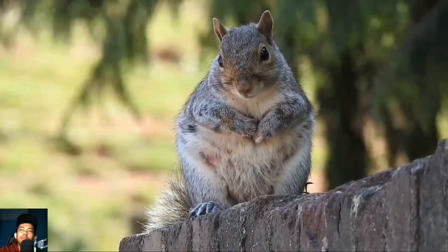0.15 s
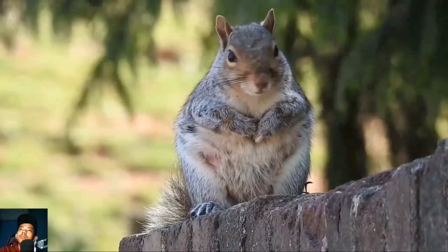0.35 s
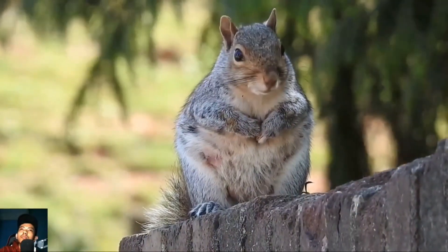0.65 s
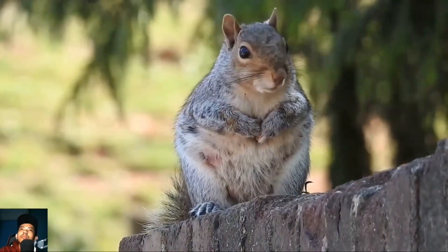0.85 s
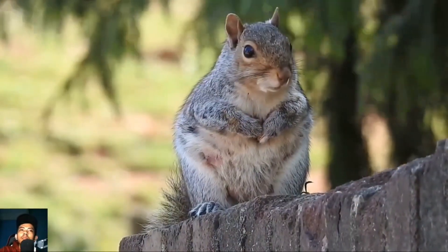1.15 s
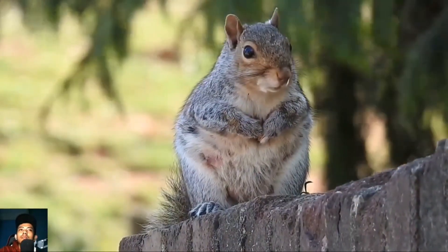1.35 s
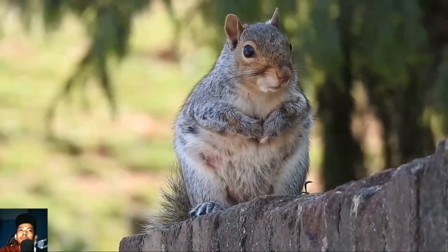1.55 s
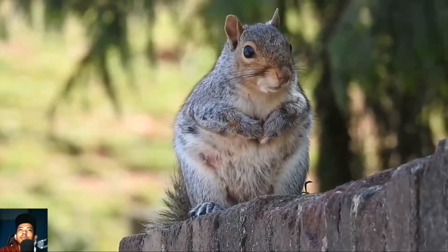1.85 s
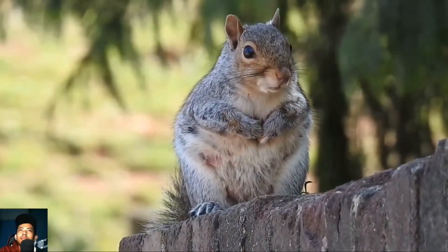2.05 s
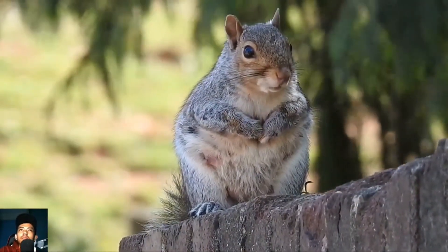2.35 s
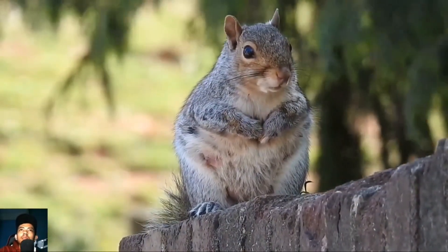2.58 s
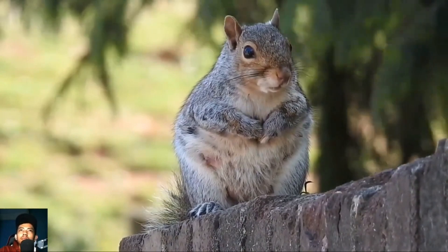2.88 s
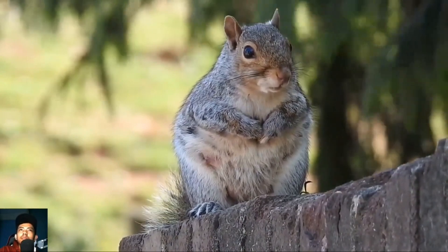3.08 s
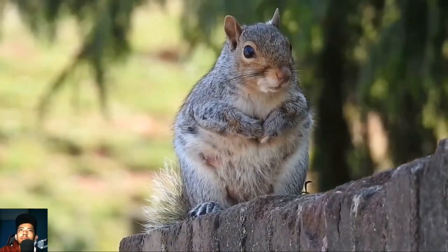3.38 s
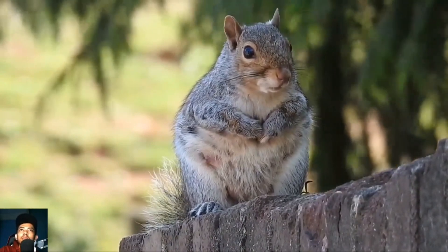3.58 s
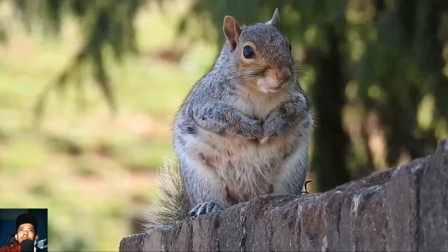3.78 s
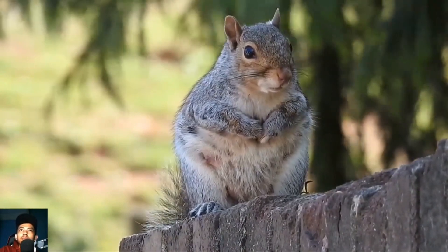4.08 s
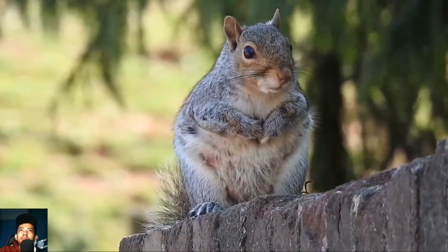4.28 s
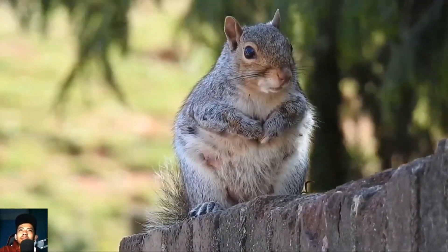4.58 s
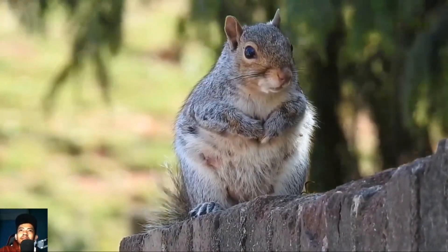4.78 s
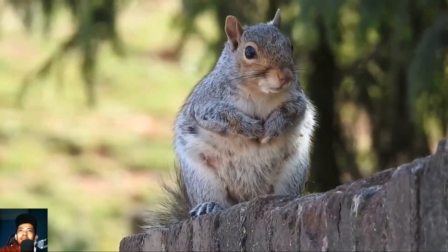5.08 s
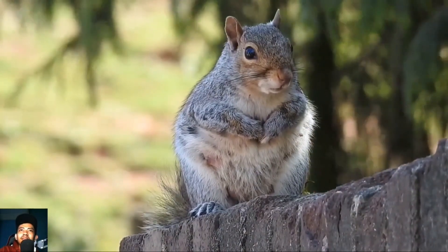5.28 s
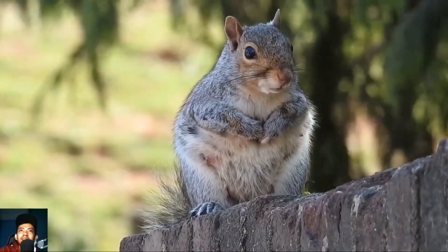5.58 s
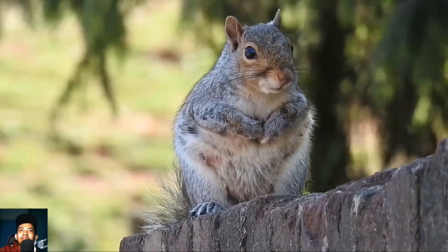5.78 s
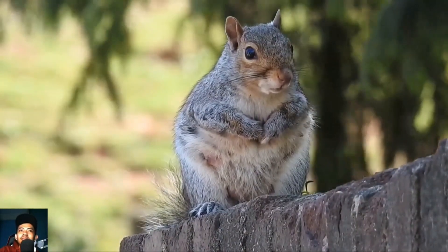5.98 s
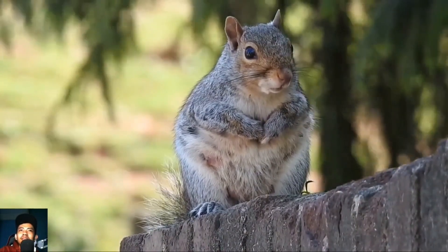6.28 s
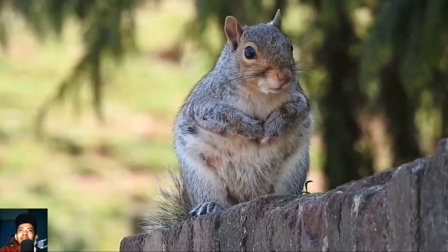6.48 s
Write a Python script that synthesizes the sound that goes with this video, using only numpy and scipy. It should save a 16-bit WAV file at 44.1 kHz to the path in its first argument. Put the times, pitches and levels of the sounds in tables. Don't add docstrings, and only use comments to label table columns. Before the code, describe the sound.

Outdoors a few metres from a squirrel on a fence. It starts with two quick pairs of thin squeaks, the second of each pair weaker, then a very faint one. From just past one second come eleven single sharp barks, irregularly spaced about half a second apart, each with a breathy edge and short echo from fence and trees. Low distant traffic and soft leaf hiss lie underneath.

```python
import sys
import numpy as np
from scipy import signal
from scipy.fft import rfft, irfft, next_fast_len
from scipy.io import wavfile
from scipy.ndimage import uniform_filter1d, minimum_filter1d, map_coordinates

SR = 44100
rng = np.random.default_rng(int(sys.argv[2]) if len(sys.argv) > 2 else 0)


def ratio(d):
    e = np.asarray(d, float) / 20
    return 10 ** e


def master(y):
    cut = np.clip(np.atleast_2d(y).T, -1, 1)
    pcm = np.round(cut * 32767)
    wavfile.write(sys.argv[1], SR, pcm.astype(np.int16))


N = 292912

# (start [s], length [s], top pitch [Hz], level [dB], half-step line over level [dB])
BARKS = [(1.262, .051, 2261, -18.5, 0), (1.715, .048, 2320, -16, 0), (2.370, .043, 2282, -16, 2),
         (2.913, .042, 2298, -17, -3.5), (3.334, .04, 2212, -16.5, -32), (3.752, .041, 2263, -16.5, -3),
         (4.236, .042, 2335, -15.5, -2), (4.951, .044, 2234, -16.5, -12), (5.352, .046, 2368, -15.5, -1.5),
         (5.852, .05, 2355, -16, -2), (6.57, .047, 2378, -15.5, 0)]
# (start [s], length [s], top pitch [Hz], level [dB], overtones over level [dB])
OPENING = [
    (0.222, .055, 2034, -22, 7.5),
    (0.733, .05, 2040, -23, 5),
]
# (start [s], length [s], top pitch [Hz], level [dB], overtones over level [dB])
CLOSING = [
    (.307, .046, 1841, -19, -5.5),
    (0.837, 0.0386, 2223, -26.5, -7.5),
    (1.181, .039, 1896, -36.5, -15.5),
]
# (time [s], peak [dB])
HOARSE = [(0.2229, -28.5), (0.3137, -36), (0.7342, -25.5), (0.842, -38), (1.1887, -52.5), (1.2675, -29),
          (1.724, -24.5), (2.3725, -27.5), (2.9174, -26.5), (3.3398, -26.5), (3.7594, -22), (4.2363, -26),
          (4.9531, -27), (5.3557, -28), (5.8564, -25), (6.5744, -28)]
BARK_ARCH = (.62, .55, .8, .71, .82)
OPENING_ARCH = (.68, .5, .76, .4, .4)
CLOSING_ARCH = (.56, .82, .86, .4, .4)
# (level [dB], full at [share], start [dB], fading from [share], end [dB])
BARK_SWELL = [(0.5, 0.33, -27.5, .7, -11.5), (-3.5, 0.33, -24, .72, -18), (-3, 0.42, -26.5, .9, -8)]
OPENING_SWELL = [(0, 0.53, -15.5, 0.68, -20), (0.62, 0.34, -26.5, 0.81, -16.5),
                 (-0.47, .2, -16.5, 0.87, -12.5)]
CLOSING_SWELL = [(0, .5, -14.5, 0.65, -17.5), (7, .12, -9.5, 0.13, -22.5), (1, 0.37, -17.5, 0.63, -8.5)]
# (centre [share], width [share], rest [dB], level in squeaks [dB])
HALF_STEP = (.62, .2, -27, -20)
# (centre [share], width [share], level [dB])
STUMBLE = (0.092, .09, -19)
# (pitch [Hz], width [Hz], boost rising [dB], falling [dB])
CATCH = (1900, 57, 5.7, 4.4)
# (frequency [Hz], gain [dB])
THROAT = [(1000, -8.5), (1600, -5), (1900, 1), (2250, -1), (2800, -7), (3300, -2), (3900, 0.5), (4250, -8),
          (4650, 2), (5100, -1), (5750, 3), (6300, -7), (6900, -8), (7500, -22.5),
          (8100, -24), (9300, -20.5), (10800, -37.5), (13500, -38.5), (16000, -43)]
# (frequency [Hz], gain [dB])
FIZZ = [(5000, -29), (7600, -12.5), (9300, 0.5), (10800, -6.5), (13500, -12), (15000, -12), (16000, -24.5)]
# (time [s], pitch [Hz], peak [dB])
LOW = [(1.29, 614, -46.5), (1.744, 663, -41), (2.396, 628, -40.5), (2.937, 635, -43), (3.359, 526, -45),
       (3.777, 599, -43), (4.261, 730, -41.5), (4.981, 1083, -46), (5.38, 830, -38), (5.883, 820, -37),
       (6.599, 840, -33)]
# (time [s], pitch [Hz], peak [dB])
THUMP = (0.263, 155, -33)
# (time [s], peak [dB])
SMACKS = [
    (1.0062, -40.5),
    (4.5244, -53),
    (5.9977, -42),
]
# (frequency [Hz], gain [dB], t60 [s])
MOUTH = [(4003, 1, 0.023), (5650, 2.5, 0.0132), (10400, -2, 0.0068), (13500, -5.5, 0.0066)]
# (until [s], extra side [dB], shadow [Hz], shadow width [Hz], shadow depth [dB])
TURNED = (1.0, 3, 6896, 451, -19)
# (frequency [Hz], side below mid [dB])
ASKEW = [(60, -7.5), (150, -5.5), (380, -7), (950, -5.5), (2380, -19), (5980, -6.5), (15000, -8)]
# (frequency [Hz], t60 [s])
YARD = [(500, 0.15), (2200, 0.1515), (5000, 0.14), (12000, 0.14)]
# (frequency [Hz], t60 [s])
TREES = [(500, 0.43), (2200, 0.77), (5000, .4), (12000, 0.85)]
# (start [s], length [s], from [Hz], to [Hz], level [dB])
CHIRPS = [
    (2.04, 0.066, 12300, 12700, -72),
    (2.11, .07, 13300, 12400, -75.5),
]
# (half length [s], centre [Hz], width [Hz], level [dB])
RUSTLE = (-0.1, 7903.5, 997.5, -73)
# (frequency [Hz], density [dB per Hz])
RUMBLE = [(8.8, -33.5), (15, 0), (65, -6.5), (134, -3.5), (150, -10), (184, -7.5), (270, -13.5),
          (306, -10.5), (364, -18.5), (450, -15.5), (580, -41), (990, -120)]
# (frequency [Hz], density [dB per Hz])
ROAD = [(210, -21.5), (350, -9), (462, -7), (590, -7.5), (974, -11), (1050, -12), (2290, -15), (5000, -29),
        (6500, -50), (11000, -120)]
# (frequency [Hz], density [dB per Hz])
HISS = [(2650, -28.5), (4500, -13), (5930, 1), (7500, 1.5), (12300, -3.5), (15700, -5.5)]
# (frequency [Hz], density [dB per Hz])
NEEDLES = [(1500, -39), (2400, -8), (3300, 0), (4500, -8), (6500, -42.5)]
# (time [s], level [dB])
BREEZE = [(0.0, -62), (0.46, -65), (0.83, -64.5), (1.0, -68.5), (1.44, -69), (2.05, -69.5), (2.35, -67),
          (2.59, -67), (4.81, -67.5), (5.34, -64), (5.47, -59), (6.32, -70), (6.64, -67.5)]
# (time [s], level [dB])
TRAFFIC = [(0.0, -58.5), (0.48, -57), (1.13, -59), (1.33, -57), (2.07, -57.5), (2.4, -56), (2.64, -58.5),
           (6.18, -56), (6.64, -58.5)]
# (frequency [Hz], width [Hz], level [dB])
HUM = [(62, 9, -55), (92, 14, -59.5), (1005.6, 27, -69.5)]
# (frequency [Hz], side below mid [dB])
WIDE = [(60, -33.5), (180, -31), (550, -20.5), (1650, -16.5), (4970, -10), (15000, -12.5)]


def squirrel():
    out = np.zeros((2, N))
    lead_s, lean = 0.018, ratio(np.array([[0.3], [-0.3]]))
    until_s, side_db, shadow_hz, width_hz, depth_db = TURNED
    for (start, length, *course), (_, hoarse_db) in zip(calls(), HOARSE):
        aside = start < until_s
        voice = bark(start, length, course, hoarse_db, not aside, lead_s)
        shadow = lambda f: ratio(aside * depth_db * np.exp(-((f - shadow_hz) / width_hz) ** 2))
        voice = filtered(voice, shadow)
        add(out, start - lead_s, lean * ports(voice, aside * side_db))
        add(out, start - lead_s + 0.009, ratio(-8.5) * answer(voice, YARD, shared=0.27))
        add(out, start - lead_s + 0.016, ratio(-28) * answer(voice, TREES, shared=0.36))
    for s, hz, db in LOW:
        add(out, s - 0.011, blip(hz, db + 5, length=0.021))
    thump_s, thump_hz, thump_db = THUMP
    add(out, thump_s - 0.02, blip(thump_hz, thump_db, length=0.034))
    t = np.arange(SR // 20) / SR
    for s, db in SMACKS:
        click = sum(ratio(db - 6 + g - 60 * t / t60) * np.sin(2 * np.pi * hz * t) for hz, g, t60 in MOUTH)
        add(out, s, click)
    return out


def calls():
    squeak_half_db = HALF_STEP[-1]
    rows = [(s, n, BARK_ARCH, BARK_SWELL, hz, db, 0, half) for s, n, hz, db, half in BARKS]
    for table, arch, swells in ((OPENING, OPENING_ARCH, OPENING_SWELL), (CLOSING, CLOSING_ARCH, CLOSING_SWELL)):
        rows += [(s, n, arch, swells, hz, db, bright, squeak_half_db) for s, n, hz, db, bright in table]
    return sorted(rows)


def bark(start, length, course, hoarse_db, facing, lead_s):
    end = start + length
    t = start - lead_s + np.arange(SR // 8) / SR
    hz, first_db, second_db, third_db, half_db = effort(np.clip((t - start) / length, 0, 1), *course)
    hz = hz * (1 + 0.009 * wobble(500, size=len(t)))
    phase = 2 * np.pi * np.cumsum(hz) / SR
    gate = np.clip(np.minimum(t - start + 0.0054, end + 0.0031 - t) / 0.0046, 0, 1) ** 2

    order = np.arange(1, 8)[:, None]
    level_db = np.array([first_db, second_db] + [third_db] * (len(order) - 2))
    pressed_db = 12.5
    level_db += pressed_db * (order > 3) * np.minimum(ratio(half_db - first_db.max()), 1)
    flutter_db = (1.2 + 0.5 * order) * np.array([wobble(450, size=len(t)) for _ in order])
    gain = ratio(level_db + flutter_db) * tract(order * hz) * (order * hz < SR / 2.7)
    folds = np.sum(gain * np.sin(order * phase), axis=0)
    settle_db = -2 - 26 * np.clip((t - start) / 0.0092, 0, 1)
    halves = np.sin(5 * phase / 2) + ratio(settle_db) * np.sin(3 * phase / 2)
    halves += ratio(-25.5) * np.sin(7 * phase / 2)
    folds += ratio(half_db) * halves
    catch_hz, catch_width_hz, rising_db, falling_db = CATCH
    boost_db = np.where(t < (start + end) / 2, rising_db, falling_db)
    folds *= ratio(facing * boost_db * np.exp(-((hz - catch_hz) / catch_width_hz) ** 2))

    gusts = rng.standard_normal((2, len(t))) * (1 + 0.57 * np.sin(phase))
    gusts = gusts * ratio(2.7 * wobble(300, size=len(t)))
    mottle_db = 4 * rng.standard_normal(size=50)
    mottle_hz = np.linspace(0, SR / 2, len(mottle_db))
    puff = unit(filtered(gusts[0], lambda f: tract(f) ** 1.13))
    fizz = unit(filtered(gusts[1], lambda f: ratio(along(FIZZ, f) + np.interp(f, mottle_hz, mottle_db))))
    strongest_db = np.max([first_db - 5, second_db, third_db], axis=0)
    effort_db = np.max(uniform_filter1d(strongest_db, size=600))
    rise = ratio(-24.5) * np.clip((t - t[0]) / 0.021, 0, 1)
    rise = rise + np.clip((t - start + 0.0067) / 0.013, 0, 1) ** 2
    after = np.clip(t - end + 0.0074, 0, None)
    breath_t60_s, hiss_t60_s = 0.063, 0.1
    puff = puff * ratio(-60 * after / breath_t60_s)
    fizz = fizz * ratio(-60 * after / hiss_t60_s) * np.clip((t - start + 0.008) / 0.01, 0, 1)
    return gate * folds + rise * (ratio(effort_db - 14) * puff + ratio(hoarse_db - 14) * fizz)


def effort(share, arch, swells, top_hz, db, bright_db, half_db):
    top, first, last, lowest, entry = arch
    rising_sag = (1 - first) * (1 - share / top) ** 2
    falling_sag = (1 - last) * ((share - top) / (1 - top)) ** 2
    sag = np.where(share < top, rising_sag, falling_sag)
    entry_share = 0.12
    hz = top_hz * np.maximum(1 - sag, np.interp(share, (0, entry_share), (entry, lowest)))

    centre, width, rest_db, _ = HALF_STEP
    burst_db = np.maximum(half_db - 10 * ((share - centre) / width) ** 4, rest_db)
    stumble_at, stumble_width, stumble_peak_db = STUMBLE
    stumble_db = stumble_peak_db - 10 * ((share - stumble_at) / stumble_width) ** 2
    stolen_db = -10.5
    extras = (0, bright_db, bright_db + stolen_db * np.minimum(ratio(burst_db), 1))
    levels = []
    for row, extra in zip(swells, extras):
        lumps_db = 1.65 * wobble(111.5, size=len(share))
        levels.append(db + swell(share, *row) + extra + lumps_db)
    return [hz, *levels, db + np.maximum(burst_db, stumble_db)]


def swell(share, db, full, start_db, fading, end_db):
    attack_db = start_db * np.clip(1 - share / full, 0, 1) ** 1.74
    release_db = end_db * np.clip((share - fading) / (1 - fading), 0, 1) ** 1.5
    return db + attack_db + release_db


def tract(hz):
    return ratio(along(THROAT, hz))


def ports(voice, extra_db):
    knots = rng.uniform(-np.pi, np.pi, size=24)
    knots_hz = np.linspace(0, SR / 2, len(knots))
    twist = lambda hz: np.exp(1j * np.interp(hz, knots_hz, knots))
    side = filtered(voice, lambda hz: ratio(along(ASKEW, hz) + extra_db) * twist(hz))
    return np.array([voice + side, voice - side])


def answer(x, decays, shared):
    common, left, right = rng.standard_normal((3, SR // 2))
    hz, t, z = signal.stft(np.array([left, right]) + shared * common, SR, nperseg=128)
    decay = ratio(-60 * t / along(decays, hz)[:, None])
    tail = signal.istft(z * decay, SR, nperseg=128)[1]
    return signal.fftconvolve(x[None], tail / np.linalg.norm(tail[0]), axes=1)


def blip(hz, db, length):
    t = np.arange(round(length * SR)) / SR
    return ratio(db) * np.sin(np.pi * t / length) ** 2 * np.sin(2 * np.pi * np.cumsum(hz + 0 * t) / SR)


def small_life():
    out, t = np.zeros(N), np.arange(N) / SR
    for s, length, from_hz, to_hz, db in CHIRPS:
        add(out, s, blip(np.linspace(from_hz, to_hz, round(length * SR)), db, length))
    half_s, centre_hz, width_hz, db = RUSTLE
    noise = rng.standard_normal((2, N))
    brush = unit(filtered(noise, lambda f: np.exp(-((f - centre_hz) / width_hz) ** 2)))
    return out + ratio(db) * np.exp(-((t - 5.29) / half_s) ** 2) * brush


def outdoors():
    t = np.arange(N) / SR
    breeze_db = np.interp(t, *np.transpose(BREEZE))
    rumble_db = -50 + 0.5 * wobble(2, size=N)
    road_db = 0.5 + np.interp(t, *np.transpose(TRAFFIC))
    hiss_db = -70.5 + 0.3 * (breeze_db - breeze_db.mean())
    air = ratio(rumble_db) * rush(RUMBLE, patchy_db=1.07)
    air += ratio(road_db) * rush(ROAD, patchy_db=2.64)
    air += ratio(hiss_db + 2) * rush(HISS, patchy_db=2.5)
    air += ratio(breeze_db - 7) * rush(NEEDLES, patchy_db=4.5)
    for hz, width_hz, db in HUM:
        noise = rng.standard_normal(N)
        air += ratio(db) * unit(filtered(noise, lambda f: np.exp(-((f - hz) / width_hz) ** 2)))
    return air


def rush(spectrum, patchy_db):
    z = signal.stft(rng.standard_normal((2, N)), nperseg=512)[2]
    field = uniform_filter1d(rng.standard_normal(z.shape[1:]), size=6, axis=0)
    field = uniform_filter1d(field, size=14, axis=1)
    pair = signal.istft(z * ratio(patchy_db * unit(field)), nperseg=512)[1][:, :N]
    mid, side = filtered(pair, lambda hz: ratio(along(spectrum, hz) + [0 * hz, along(WIDE, hz)]))
    return unit(np.array([mid + side, mid - side]))


def unit(x):
    return x / np.sqrt(np.mean(x ** 2) + 1e-20)


def along(points, hz):
    f, v = np.transpose(points)
    return np.interp(np.log(hz + 1), np.log(f + 1), v)


def wobble(rate, size):
    knots = rng.standard_normal(int(size * rate / SR) + 4)
    return map_coordinates(knots, [np.arange(size) * rate / SR])


def filtered(x, response):
    n = x.shape[-1]
    m = next_fast_len(n + 4096)
    return irfft(rfft(x, m) * response(np.fft.rfftfreq(m, 1 / SR)), m)[..., :n]


def add(track, s, piece):
    part = track[..., round(s * SR):][..., :piece.shape[-1]]
    part += piece[..., :part.shape[-1]]


def scene():
    return squirrel() + small_life() + outdoors()


def masked(x, near_db, far_db, top_db):
    hz, _, z = signal.stft(x, SR, nperseg=1024)
    power = uniform_filter1d(np.mean(np.abs(z) ** 2, axis=0), size=11, axis=0)
    band_db = 10 * np.log10(np.abs(power) + 1e-20)
    nearby_db = -minimum_filter1d(-band_db, size=91, axis=0)
    loudest_db = np.max(band_db[hz > 1000], axis=0)
    hz = hz[:, None]
    weak = (band_db < nearby_db - near_db) | (band_db < loudest_db - far_db + top_db * (hz > 14500))
    keep = ~(weak & (hz > 2500)) & (hz < 15600)
    return signal.istft(z * keep, SR, nperseg=1024)[1][:, :N]


def top_cut(x):
    return signal.sosfilt(signal.butter(12, 15810, fs=SR, output="sos"), x)


def record(dry):
    rounded = dry / (1 + np.abs(dry / 0.48) ** 4) ** (1 / 4)
    thinned = masked(rounded, near_db=29, far_db=49, top_db=7.5)
    return top_cut(thinned)


dry = scene()
out = record(dry)
master(out)
```